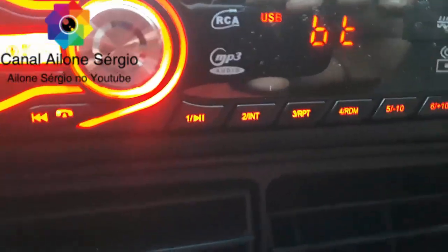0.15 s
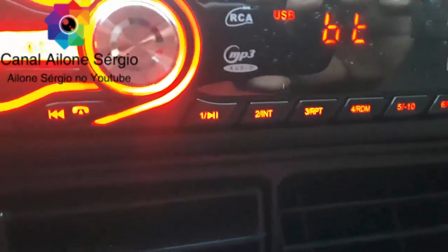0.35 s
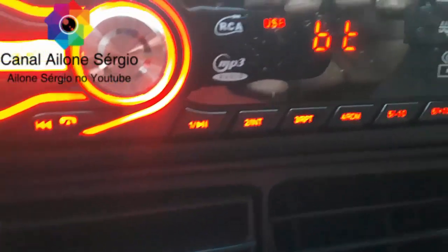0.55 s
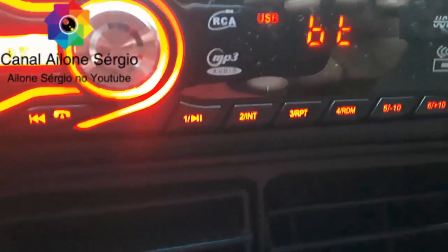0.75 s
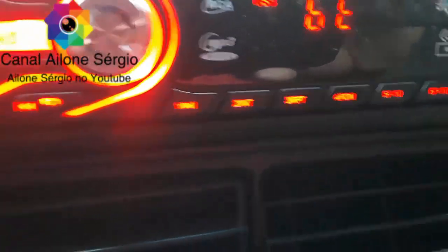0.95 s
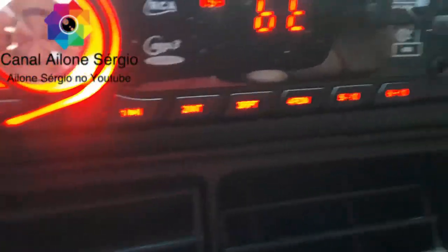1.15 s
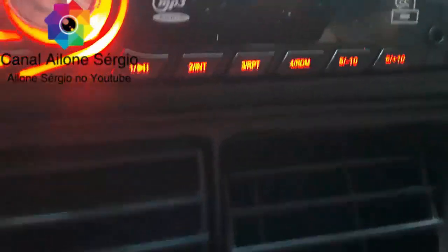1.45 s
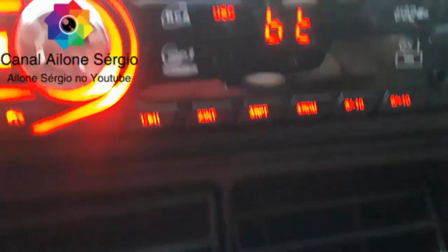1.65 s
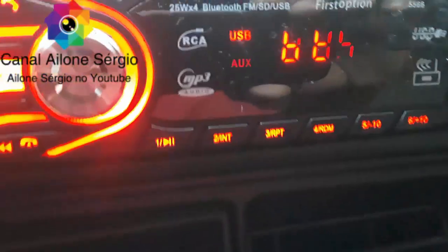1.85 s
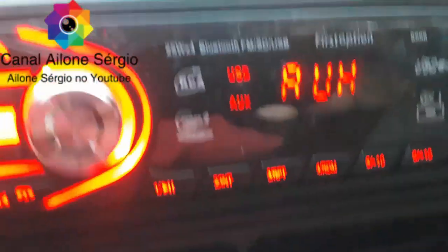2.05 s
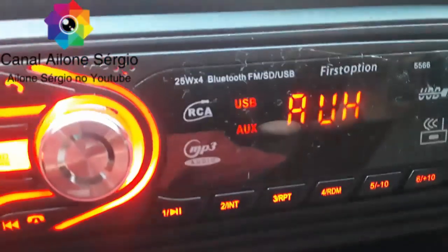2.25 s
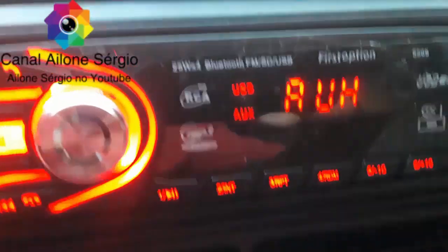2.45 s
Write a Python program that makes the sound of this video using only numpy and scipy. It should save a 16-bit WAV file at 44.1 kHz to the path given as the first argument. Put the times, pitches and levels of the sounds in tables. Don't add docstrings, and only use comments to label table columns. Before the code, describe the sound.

Close up in a quiet parked car, two crisp button clicks come quickly, press then release, then a tiny skin squeak and faint taps, and a much softer snap, over low rumble and steady hiss.

```python
import sys
import numpy as np
from scipy import signal
from scipy.fft import rfft, irfft
from scipy.io import wavfile

SR = 44100
rng = np.random.default_rng(int(sys.argv[2]) if len(sys.argv) > 2 else 0)


def digitize_waveform(pressure):
    field = np.atleast_2d(pressure).T
    bounded = np.clip(field, -1, 1)
    quanta = np.round(bounded * 32767).astype(np.int16)
    wavfile.write(sys.argv[1], SR, quanta)


def natural_amplitude(level_db):
    exponent = np.asarray(level_db, float) / 20
    return 10 ** exponent


N = 114660

# f/Hz, level/dB per Hz
RUMBLE_COLOUR = [(12, -47), (20, -15), (86, -1.5), (145, -7), (219, -18), (369, -18), (416, -25),
                 (448, -23), (700, -27), (910, -48), (1540, -120)]
HISS_COLOUR = [(290, -32.5), (500, -1), (570, -3), (750, -2), (7640, -8), (12900, -3.5), (14900, -6),
               (16000, -22.5)]
# f/Hz, side minus mid/dB
FLOOR_SIDE = [(60, -13.5), (110, -15), (200, -15.5), (380, -8), (700, -6), (1290, -4.5), (2380, -4),
              (4400, -1), (8120, 0.5), (15000, -2.5)]
RUMBLE_DB, RUMBLE_SWAY_DB = -68.5, 0.7
HISS_DB, HISS_SWAY_DB = -69.5, 0.3

# t/s, level/dB, hardness as low-pass f/Hz
PRESS_CONTACTS = [
    (.2430, -48, 15000),
    (.2459, -5, 16000),
    (.2477, -11, 16000),
    (.2488, -13, 12000),
]
RELEASE_CONTACTS = [
    (.4970, -64, 11990),
    (.4991, -12, 2800),
    (.5009, -17, 15000),
    (.5023, -23, 15000),
    (.5034, -31, 15000),
]
SOFT_CONTACTS = [
    (1.5715, -47, 2000),
    (1.5752, -28.5, 12000),
    (1.5775, -29, 12100),
    (1.5800, -28.5, 12010),
]
# f/Hz, level/dB, t60/s
PRESS_DOME = [(2052, -19.5, .005), (4500, -2.72, 0.0037), (6400, -7, 0.0014), (8016, -14, .006),
              (13180, -12.5, .010)]
RELEASE_DOME = [(1879, -20.5, .008), (3977, -6, 0.017), (7840, -5.5, .010), (11300, -17, 0.0091),
                (14000, -16, .006)]
SOFT_DOME = [(1547, -14.5, 0.044), (3780, -2.3, 0.028), (5190, -21, 0.016), (7450, -20, 0.006),
             (15000, -27, 0.0043)]
# f/Hz, level/dB, t60/s
PRESS_MODES = [(661.4, -11, .05), (755.6, -6, .05), (1010, -15, .09), (1174, -20, .05), (1895, -7, 0.03),
               (3854, -4.5, .05), (4720, -0.5, 0.023), (5346, 3.5, .025)]
RELEASE_MODES = [(650, -25, 0.03), (792, -2.5, 0.05), (919, -10, 0.17), (1100, -12, 0.18),
                 (1364, -16.5, .05), (1500, -26.5, .05), (1570, -7.5, 0.086), (1950, -3.5, 0.077),
                 (2425, -3.5, 0.052), (4150, -3, .035), (4570, -1, 0.055)]
SOFT_MODES = [(1500, -8, 0.055), (1487, -1.5, 0.11), (2074, -5, 0.07), (2580, -32, 0.055),
              (3340, 5.5, 0.035), (3750, -5, 0.019), (4500, -25, .03)]
PANEL_DB = [-23, -14.5, -17]
# f/Hz, level/dB per Hz
PRESS_SHIVER = [(150, -48.5), (250, -29), (1280, -12), (1910, 3.5), (2710, -13), (5350, 5.5), (6820, -15),
                (13200, -14), (16000, -23.5)]
RELEASE_SHIVER = [(150, -63), (250, -11), (761, -19.5), (860, -6.5), (1790, 2.5), (1910, 4), (2760, -6),
                  (8120, -6.5), (16000, -23)]
SOFT_SHIVER = [(150, -52), (250, -21), (988, -13), (1220, -15), (1470, 2), (1790, -1), (3840, -2.5),
               (4730, -3.5), (16000, -52)]
SHIVER_DB = [6.5, 11, 7.5]
# f/Hz, t60/s
SHIVER_T60 = [(300, .06), (800, .06), (2000, .05), (5000, .035), (14000, .03)]
STRIKE_SPREAD_DB, LONGEST_RING_S, PANEL_LOW_CUT_HZ = -0.5, 0.085, 802

# t/s, level/dB, f/Hz, t60/s
TOUCHES = [(.2465, -52.5, 185, 0.033), (.2465, -52.5, 63, 0.034), (0.4988, -43, 200, .03),
           (.516, -57.5, 190, .08), (0.4985, -54.5, 79, 0.1), (0.513, -62, 324, 0.13),
           (1.575, -54, 60, .04), (1.577, -68, 323, 0.1), (1.222, -65, 403, 0.093),
           (1.232, -63.5, 333, 0.06), (1.260, -68.5, 2013, .02), (1.260, -68.5, 1080, 0.037),
           (1.3502, -50, 14000, .003), (1.3507, -57, 11070, .003), (2.397, -69.5, 375, 0.071)]

# t/s, energy/dB
ECHOES = [
    (.247, -8),
    (.5005, -6.5),
    (1.576, -18),
]
# f/Hz, level/dB per Hz
PRESS_ECHO = [(120, -40), (200, -10.5), (1300, -5.5), (2210, 0.5), (3250, -13), (3900, 2.5), (4430, -17),
              (16000, -28)]
RELEASE_ECHO = [(120, -42), (200, -17.5), (683, -22), (883, -4.5), (1300, -9), (2330, -11), (3130, -25.5),
                (16000, -40)]
SOFT_ECHO = [(120, -56), (200, -26), (312, -14), (1030, -8.5), (1270, -7.5), (1460, -5.5), (1610, -3.5),
             (9000, -33.5), (11700, -57), (19800, -120)]
# f/Hz, t60/s
CABIN_T60 = [(300, 0.12), (900, 0.1443), (2000, 0.0932), (5000, 0.18), (14000, 0.14)]
CABIN_BUILD_S, CABIN_SIDE_DB = 0.0098, -23

SQUEAK_S, SQUEAK_LENGTH_S, SQUEAK_DB, SQUEAK_FADE_DB = 1.092, 0.11, -71.5, 12
SQUEAK_HZ, SQUEAK_SAG_HZ_PER_S, SQUEAK_WIDTH_HZ = 4080, 3800, 150


def at_hz(points, hz):
    table_hz, values = np.array(points).T
    return np.interp(np.log(hz + 1e-9), np.log(table_hz), values)


def rms_one(x):
    return x / np.sqrt(np.mean(x ** 2) + 1e-20)


def noise_floor(colour, level_db, sway_db):
    hz = np.fft.rfftfreq(N, 1 / SR)
    mid, side = rfft(rng.standard_normal((2, N))) * natural_amplitude(at_hz(colour, hz))
    side = side * natural_amplitude(at_hz(FLOOR_SIDE, hz))
    noise = rms_one(irfft([mid + side, mid - side], N))
    sway = np.interp(np.arange(N), np.linspace(0, N, num=14), rng.standard_normal(14))
    return noise * natural_amplitude(level_db + sway_db * sway)


def outside_rumble():
    return noise_floor(RUMBLE_COLOUR, RUMBLE_DB, RUMBLE_SWAY_DB)


def microphone_hiss():
    return noise_floor(HISS_COLOUR, HISS_DB, HISS_SWAY_DB)


def ring(clicks, hz, t60):
    r = natural_amplitude(-60 / (t60 * SR))
    w = 2 * np.pi * hz / SR
    return signal.lfilter([0, np.sin(w)], [1, -2 * r * np.cos(w), r * r], clicks + 1e-18)


def dying_noise(colour, t60s, channels):
    size = SR // 2
    t = np.arange(size) / SR
    edges = 150 * 2 ** np.arange(0, 7.1, 1 / 3)
    white = rng.standard_normal((2, channels, size))
    out = 0
    for k, (low, high) in enumerate(zip(edges, edges[1:])):
        hz = np.sqrt(low * high)
        t60 = at_hz(t60s, hz)
        band = signal.butter(2, [low, high], "band", fs=SR, output="sos")
        noise = signal.sosfilt(band, white[k % 2])
        out = out + noise * natural_amplitude(at_hz(colour, hz) - 60 * t / t60) / np.sqrt(t60)
    return out / np.sqrt(np.sum(out[0] ** 2))


def snap(contacts, dome, modes, panel_db, shiver, shiver_db):
    size = SR // 2
    click = -signal.unit_impulse(size)
    panel = [(hz, db + panel_db, min(t60, LONGEST_RING_S)) for hz, db, t60 in modes]
    bodies = list(dome) + panel
    ringing, shivering = layers = np.zeros((2, N))
    for s, db, hardness_hz in contacts:
        rings = np.zeros(size)
        for (hz, body_db, t60), chance in zip(bodies, rng.standard_normal(len(bodies))):
            rings += natural_amplitude(body_db + STRIKE_SPREAD_DB * chance) * ring(click, hz, t60)
        fascia = natural_amplitude(shiver_db) * dying_noise(shiver, SHIVER_T60, channels=1)[0]
        soften = signal.butter(2, np.clip(hardness_hz, 200, 19000), fs=SR, output="sos")
        i = int(s * SR)
        layers[:, i:i + size] += natural_amplitude(db) * signal.sosfilt(soften, [rings, fascia])[:, :N - i]
    low_cut = signal.butter(4, PANEL_LOW_CUT_HZ, "high", fs=SR, output="sos")
    return signal.sosfilt(low_cut, ringing) + shivering


def touches():
    out = np.zeros(N)
    for s, db, hz, t60 in TOUCHES:
        out += natural_amplitude(db) * ring(signal.unit_impulse(N, int(s * SR)), hz, t60)
    return out


def cabin():
    out = np.zeros((2, N))
    for (s, db), colour in zip(ECHOES, [PRESS_ECHO, RELEASE_ECHO, SOFT_ECHO]):
        mid, side = natural_amplitude(db) * dying_noise(colour, CABIN_T60, channels=2)
        side = natural_amplitude(CABIN_SIDE_DB) * side
        build = np.clip(np.arange(len(mid)) / SR / CABIN_BUILD_S, 0, 1)
        i = int(s * SR)
        out[:, i:i + len(mid)] += build * np.array([mid + side, mid - side])
    return out


def squeak():
    t = np.arange(N) / SR - SQUEAK_S
    narrow = signal.butter(2, SQUEAK_WIDTH_HZ, fs=SR, output="sos")
    rough = signal.sosfilt(narrow, rng.standard_normal((2, N)))
    phase = 2 * np.pi * (SQUEAK_HZ * t - SQUEAK_SAG_HZ_PER_S * t ** 2 / 2)
    tone = rms_one(rough[0] * np.cos(phase) + rough[1] * np.sin(phase))
    fade_in = np.clip(t / 0.0029, 0, 1)
    fade_out = np.clip((SQUEAK_LENGTH_S - t) / 0.018, 0, 1)
    level_db = SQUEAK_DB - SQUEAK_FADE_DB * np.clip(t / SQUEAK_LENGTH_S, 0, 1)
    return tone * fade_in * fade_out * natural_amplitude(level_db)


def scene():
    background = outside_rumble() + microphone_hiss()
    press = snap(PRESS_CONTACTS, PRESS_DOME, PRESS_MODES, PANEL_DB[0], PRESS_SHIVER, SHIVER_DB[0])
    release = snap(RELEASE_CONTACTS, RELEASE_DOME, RELEASE_MODES, PANEL_DB[1], RELEASE_SHIVER, SHIVER_DB[1])
    soft_press = snap(SOFT_CONTACTS, SOFT_DOME, SOFT_MODES, PANEL_DB[2], SOFT_SHIVER, SHIVER_DB[2])
    button = press + release + soft_press
    return background + button + touches() + cabin() + squeak()


def roll_off(x):
    return signal.sosfilt(signal.butter(12, 16460, fs=SR, output="sos"), x)


def record(dry):
    top_cut = signal.cheby2(10, 60, 16600, fs=SR, output="sos")
    mix = signal.sosfilt(top_cut, dry)
    return roll_off(mix)


dry = scene()
out = record(dry)
digitize_waveform(out)
```